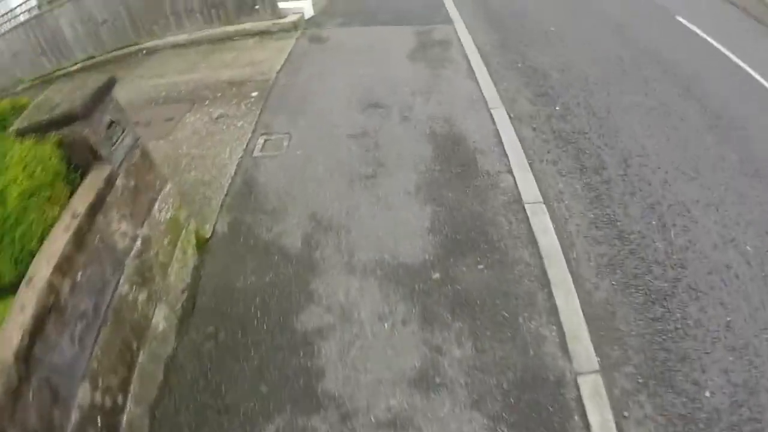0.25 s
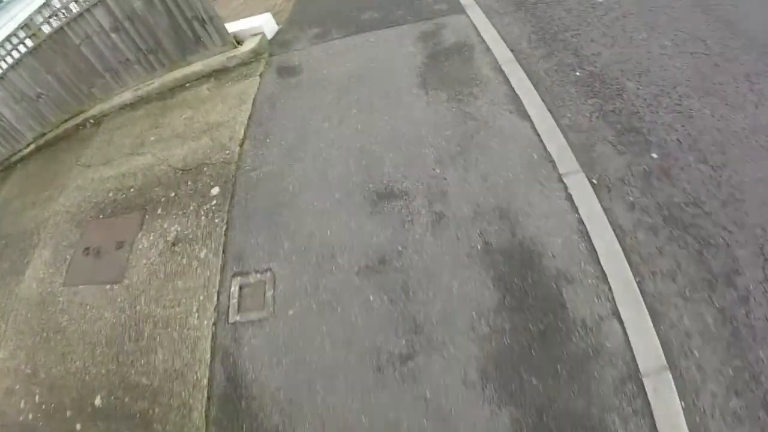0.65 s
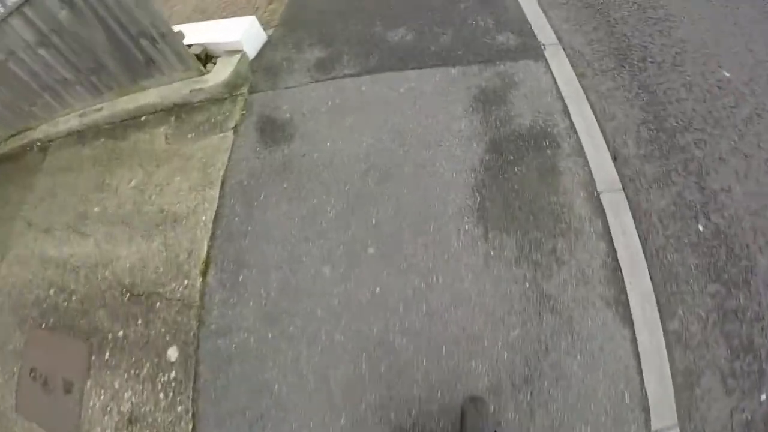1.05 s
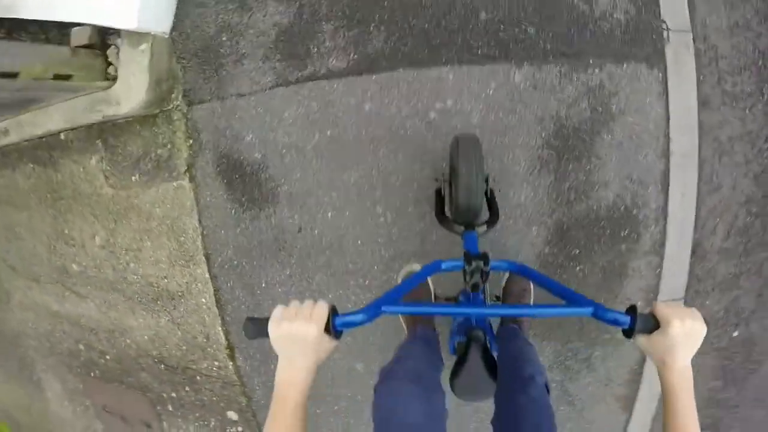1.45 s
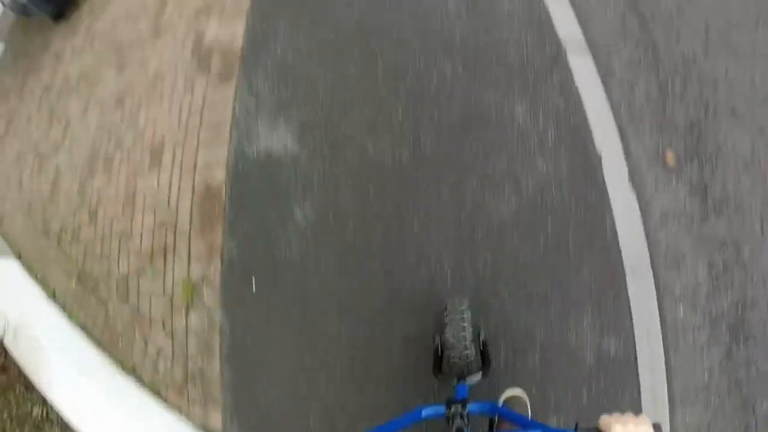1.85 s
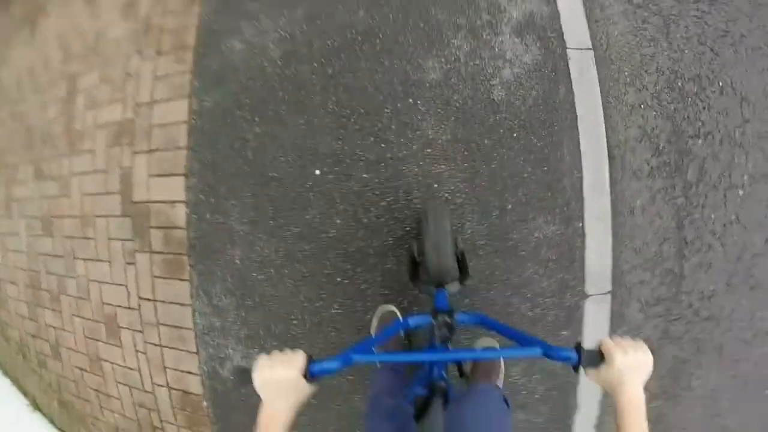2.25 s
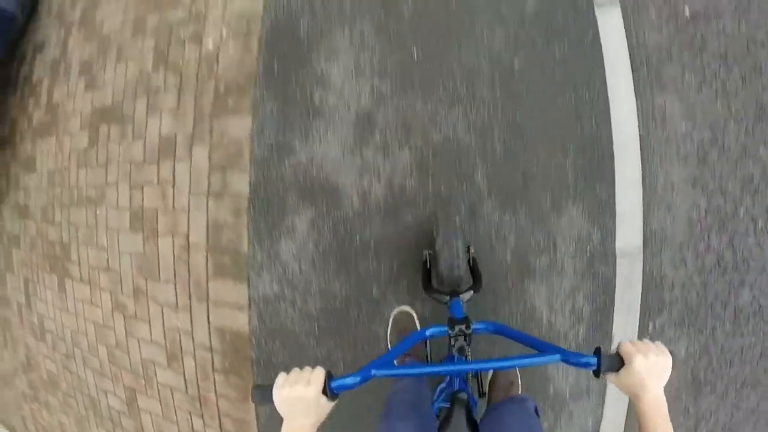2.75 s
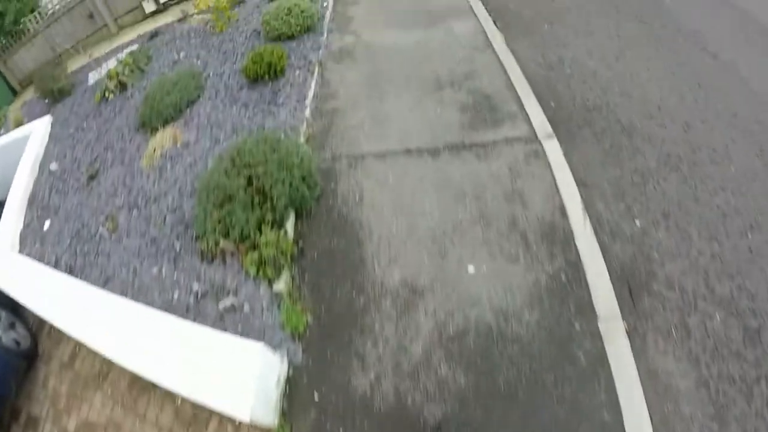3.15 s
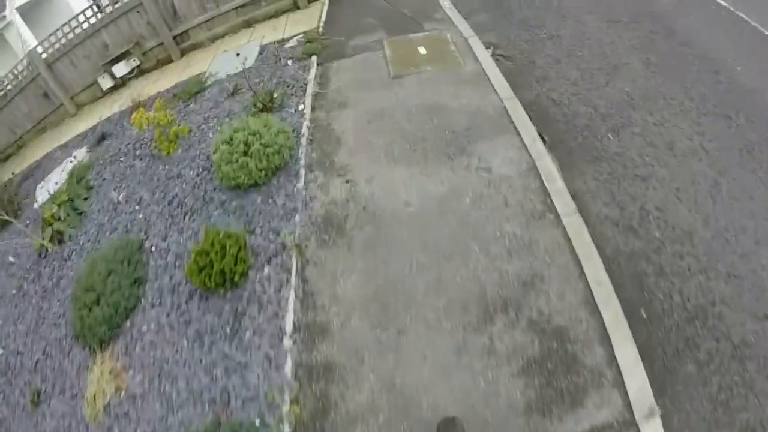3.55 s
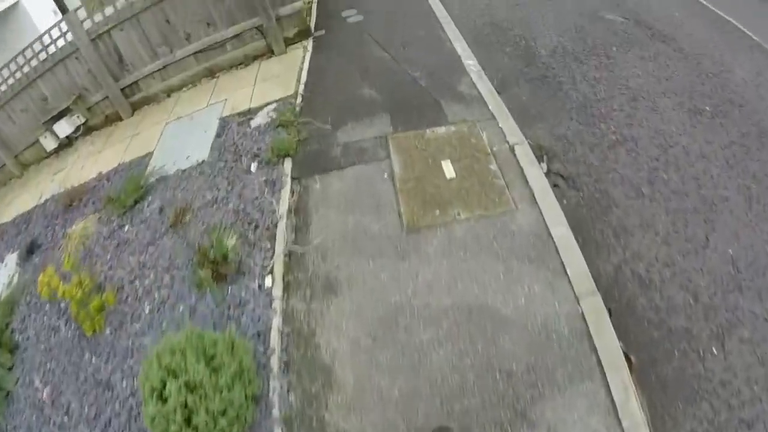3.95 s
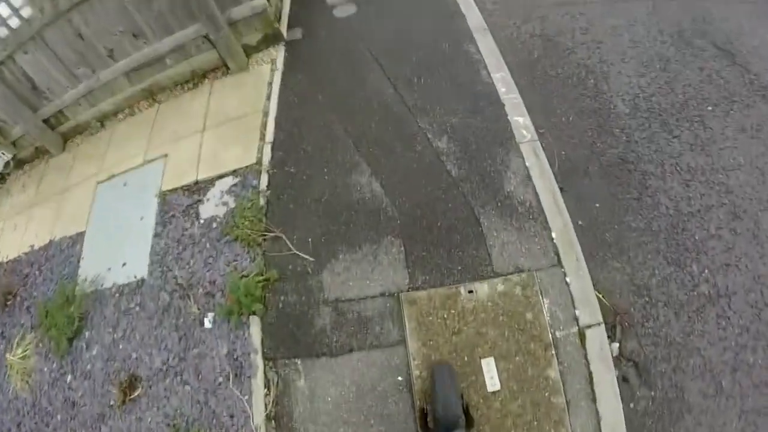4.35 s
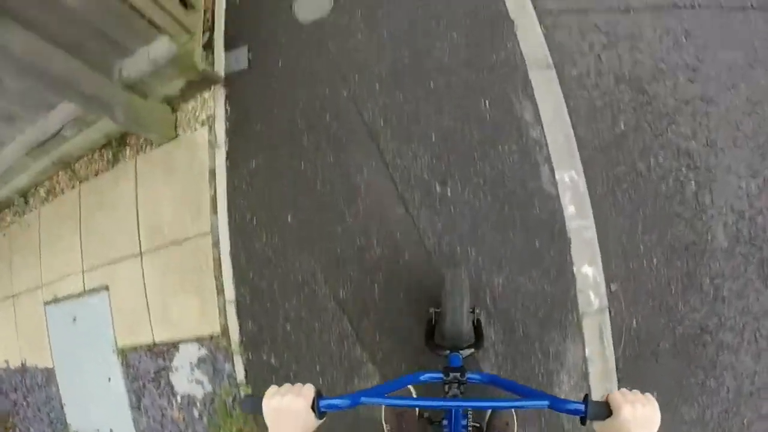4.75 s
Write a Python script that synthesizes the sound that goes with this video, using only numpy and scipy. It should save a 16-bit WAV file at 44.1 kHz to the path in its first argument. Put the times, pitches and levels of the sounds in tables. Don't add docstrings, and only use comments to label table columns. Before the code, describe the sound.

Close perspective from a head-worn camera outdoors on a small bike. A soft steady tyre and street wash lies under lumpy low wind bumps. Short dull strap scuffs and tiny ticks come scattered, stronger around the middle. Fabric drag builds, then just after four seconds a loud, uneven run of hard plastic knocks rattles for under a second, with faint springy pings, before quiet rolling returns.

```python
import sys
import numpy as np
from scipy import signal
from scipy.io import wavfile
from scipy.ndimage import uniform_filter1d, minimum_filter1d

SR = 44100
rng = np.random.default_rng(int(sys.argv[2]) if len(sys.argv) > 2 else 0)


def convert_level_to_amplitude(level_db):
    exponent = np.asarray(level_db, float) / 20
    return 10 ** exponent


def inscribe(sig):
    pcm = np.round(np.clip(np.atleast_2d(sig).T, -1, 1) * 32767)
    wavfile.write(sys.argv[1], SR, pcm.astype(np.int16))


N = 220588

CLIP = [(2200, -0.5, .022), (2401, -0.5, 0.0081), (2582, 1.5, 0.011), (2880, -3, 0.011)]


def evened(x):
    return x / np.sqrt(np.mean(x ** 2) + 1e-20)


def steadied(x, size):
    return x / np.sqrt(uniform_filter1d(x ** 2, size=size) + 0.037)


def add(mix, s, sound):
    part = mix[round(s * SR):][:len(sound)]
    part += sound[:len(part)]


def swells(rows, rest_db, t=None, edge=2):
    t = np.arange(N) / SR if t is None else t
    gain = convert_level_to_amplitude(rest_db)
    for s, db, width in rows:
        gain = gain + convert_level_to_amplitude(db) * np.exp(-.5 * abs((t - s) / width) ** edge)
    return gain


def noise(points, patchy_db, size):
    hz = np.fft.rfftfreq(size, 1 / SR)
    a, b, patches = rng.standard_normal((N * 4 // size + 5, len(hz), 3)).T
    patches = uniform_filter1d(patches, size=16, axis=0)
    patches = evened(uniform_filter1d(patches, size=8, axis=1))
    f, db = np.transpose(points)
    colour_db = np.interp(np.log(hz + 1), np.log(f + 1), db)[:, None]
    z = (a + 1j * b) * convert_level_to_amplitude(colour_db + patchy_db * patches)
    sound = signal.istft(z, nperseg=size, noverlap=size * 3 // 4)[1]
    return evened(sound[:N])


def resonate(x, hz, width):
    turn = np.exp(2j * np.pi * np.cumsum(hz * np.ones(len(x))) / SR)
    r = np.exp(-np.pi * width / SR)
    return 2 * (turn * signal.lfilter([1 - r], [1, -r], x / turn)).real


def resonate_twice(x, hz, width):
    return resonate(resonate(x, hz, width), hz, width)


def road():
    # (f/Hz, level/dB)
    wash_colour = [(41, -46), (70, -7), (107, -13.5), (168, -13.5), (565, -19.5), (1080, -23), (1700, -22),
                   (2380, -26), (2720, -24), (3480, -31), (4460, -31.5), (12200, -47), (15000, -57)]
    # (t/s, level/dB, half-width/s)
    loose = [
        (1.25, -71, 0.11),
        (1.75, -64, 0.16),
        (2.03, -69.5, .1),
        (2.85, -66.5, 0.32),
        (3.65, -69.5, 0.1),
        (4.9, -78, 0.22),
    ]
    # (t/s, level/dB, half-width/s)
    ribbed = [
        (.25, -64, 0.064),
        (3.7, -61, 0.076),
        (4.4, -53, 0.29),
    ]
    # (t/s, level/dB, half-width/s)
    taut = [
        (1.04, -79, .2),
        (1.6, -78, 0.064),
        (2.1, -75, 0.074),
        (3.0, -84, 0.24),
        (3.85, -84, 0.23),
    ]
    hum_colour = [(60, -43), (100, -7.5), (160, -2.5), (240, -10.0), (400, -19.0), (700, -86), (2000, -110)]
    wash = convert_level_to_amplitude(-55.5) * noise(wash_colour, patchy_db=0.5, size=1024)
    hum = noise(hum_colour, patchy_db=0.0, size=2048)
    struck = rng.random(N) < 4000 / SR
    grain_gain = convert_level_to_amplitude(3.4 * np.minimum(rng.exponential(1, N), 5))
    grains = struck * grain_gain * rng.standard_normal(N)
    tread = resonate_twice(grains, 2650, 400)
    grit = resonate(resonate(grains, 3700, 1700), 4280, 1500) + 1.3 * tread
    chain = resonate_twice(grains[::-1], 5870, 400)
    rolling = swells(ribbed, -66) * hum + swells(loose, -81.5) * evened(grit)
    return wash + rolling + swells(taut, -87.5) * evened(chain)


def wind():
    # (f/Hz, level/dB)
    wind_colour = [(3, -15), (8, 14), (20, 7), (35, -5.5), (50, -16.5), (80, -54.5)]
    # (f/Hz, level/dB)
    sway_colour = [(25, -28.5), (40, 4), (55, 2), (70, -17.5), (95, -15.5), (140, -52)]
    # (t/s, level/dB, half-width/s)
    gust_times = [(0.0, -39, 0.077), (.13, -39, .045), (.53, -39, 0.11), (.76, -34, 0.034),
                  (1.03, -30.5, 0.076), (1.19, -39, 0.017), (1.35, -28.5, 0.082), (1.63, -18.5, 0.039),
                  (1.8, -26, 0.043), (2.05, -46, 0.037), (2.23, -33.5, 0.27), (2.6, -22.5, 0.055),
                  (2.85, -38.5, 0.21), (3.06, -31.5, 0.073), (3.22, -40, 0.071), (3.37, -28.5, 0.02),
                  (3.56, -34, 0.096), (3.78, -44.5, 0.16), (3.95, -30.5, 0.018), (4.07, -31, 0.083),
                  (4.22, -38, 0.035), (4.4, -41.5, 0.058), (4.56, -38.5, 0.082), (4.73, -31, 0.047),
                  (4.93, -30, 0.087)]
    # (t/s, level/dB)
    jolts = [(.14, -52), (0.311, -52), (.43, -49.5), (.57, -40), (.85, -63), (1.63, -44), (1.72, -44),
             (1.81, -44), (2.06, -43.5), (2.27, -42), (2.55, -32.5), (2.73, -45), (3.05, -51),
             (3.22, -46.5), (3.48, -53), (3.6, -49), (4.06, -36), (4.15, -34.5), (4.259, -31), (4.38, -47),
             (4.479, -35.5), (4.61, -29.5), (4.77, -50)]
    gusts = steadied(noise(wind_colour, patchy_db=5.5, size=8192), size=5000)
    sway = steadied(noise(sway_colour, patchy_db=0.3, size=8192), size=2500)
    jolt_swells = [(s, db, 0.033) for s, db in jolts]
    low = swells(gust_times, -55) * gusts + swells(jolt_swells, -51.5) * sway
    return signal.sosfilt(signal.butter(4, 180, fs=SR, output="sos"), low)


def stroke(s, db, width):
    t = s + np.arange(-.2, .2, 1 / SR)
    return t[0], swells([(s, db - 1, width)], -120, t, edge=3)


def scuff(start, pressure, centre):
    size = len(pressure)
    unevenness = evened(uniform_filter1d(rng.standard_normal(size), size=90))
    slips = rng.standard_normal(size) * convert_level_to_amplitude(1.94 * unevenness)
    broad = resonate_twice(slips, centre, 1100)
    body = sum(resonate(broad, f, 350) for f in (1500, 1760, 2200, 2710))
    return start, pressure * evened(body + 0.57 * broad)


def brush(start, pressure):
    air = resonate_twice(rng.standard_normal(len(pressure)), 5200, 2800)
    return start, pressure * evened(air)


def strap():
    # (t/s, level/dB, half-width/s, f/Hz)
    scuffs = [(0.202, -54, 0.0092, 1700), (0.319, -60, .055, 1920), (.72, -58, 0.019, 1710),
              (0.824, -55, .025, 1850), (.995, -51, 0.0056, 1710), (1.322, -50.5, 0.011, 1770),
              (1.495, -56, 0.012, 1750), (1.571, -44, 0.019, 1770), (1.741, -69, 0.11, 2380),
              (2.116, -43.5, .02, 1650), (2.227, -47.5, 0.019, 1650), (2.316, -49.5, 0.022, 1620),
              (2.499, -55.5, 0.058, 1800), (2.592, -42.5, 0.019, 1720), (2.629, -45, 0.012, 1790),
              (2.74, -56, 0.04, 1670), (3.258, -52.5, 0.015, 1600), (3.446, -58, .012, 1980),
              (3.523, -56, 0.02, 1980), (3.74, -53.5, 0.068, 2250), (3.835, -50, 0.032, 1770)]
    # (t/s, level/dB, half-width/s)
    brushes = [
        (2.588, -58, 0.01),
        (2.719, -58, .007),
    ]
    # (t/s, level/dB, f/Hz)
    drag = [
        (3.3, -69, 1800),
        (3.44, -57, 1960),
        (3.66, -59, 2050),
        (3.78, -53, 2380),
        (3.96, -54.5, 1900),
        (4.07, -49.5, 2200),
        (4.7, -48.5, 2130),
        (4.821, -55.5, 1960),
        (5.0, -68, 2120),
    ]
    out = np.zeros(N)
    for s, db, width, hz in scuffs:
        add(out, *scuff(*stroke(s, db, width), hz))
    for row in brushes:
        add(out, *brush(*stroke(*row)))
    s, db, hz = np.transpose(drag)
    t = np.arange(N) / SR
    pressure = convert_level_to_amplitude(np.interp(t, s, db, left=-120))
    add(out, *scuff(0, pressure, np.interp(t, s, hz)))
    return out


def ring(s, modes, db, contact_ms, chatter_ms, spread_db=0.73):
    t = np.arange(3000)[:, None] / SR
    hz, height_db, t60 = np.transpose(modes)
    luck, detune, phase = rng.standard_normal((3, len(modes)))
    build_up = (1 - np.exp(-t * 3000 / max(contact_ms, .05))) ** 2
    swell = build_up * convert_level_to_amplitude(-60 * t / t60)
    swell = swell / swell.sum(0) * convert_level_to_amplitude(height_db + spread_db * luck)
    body = (swell * np.sin(2 * np.pi * hz * (1 + .007 * detune) * t + .9 * phase)).sum(1)
    chatter = rng.standard_normal(300) * np.exp(-t[:300, 0] * 1000 / chatter_ms)
    sound = signal.fftconvolve(chatter, body)
    power = uniform_filter1d(sound ** 2, size=100)
    return s - power.argmax() / SR, convert_level_to_amplitude(db) * sound / np.sqrt(power.max())


def thumps():
    # (t/s, level/dB)
    rocks = [(0.5373, -41), (4.071, -26.5), (4.1319, -34), (4.2212, -32), (4.252, -33.5), (4.3404, -28),
             (4.363, -34.5), (4.4407, -39), (4.5558, -31.5), (4.6346, -22), (4.6706, -30.5), (4.76, -25.5)]
    # (f/Hz, level/dB, t60/s)
    mount = [(99, -4.5, .07), (137, -4, 0.058), (160.3, 0, 0.051), (204.6, -7.5, 0.038)]
    out = np.zeros(N)
    for s, db in rocks:
        add(out, *ring(s, mount, db, contact_ms=3.5, chatter_ms=1.0))
    return out


def pings():
    # (t/s, level/dB, f/Hz, t60/s)
    spring = [
        (4.069, -37, 2200, 0.066),
        (4.219, -32.5, 2200, 0.029),
        (4.635, -38, 2200, 0.056),
        (4.635, -32, 2880, 0.027),
        (4.759, -37.5, 2210, 0.0875),
        (4.76, -47, 2870, 0.059),
    ]
    out = np.zeros(N)
    for s, db, hz, t60 in spring:
        add(out, *ring(s, [(hz, 0, t60)], db, contact_ms=2.5, chatter_ms=0.031))
    return out


def ticks():
    # (t/s, ring level/dB, clip level/dB)
    tick_times = [(0.256, -63, -52), (0.346, -58, -70), (0.5959, -58, -69), (0.9448, -62, -54),
                  (1.267, -63, -62), (1.5529, -60, -51), (1.7349, -54, -52), (1.781, -51, -46.5),
                  (2.0297, -50.5, -51.5), (2.0924, -58, -56), (2.6448, -56, -56), (2.8245, -68, -55),
                  (4.0097, -38, -35.5), (4.033, -48, -51), (4.199, -55.5, -49), (4.966, -50.5, -44),
                  (4.9747, -54, -42.5)]
    # (f/Hz, level/dB, t60/s)
    tick_modes = [(4240, -8, 0.0087), (4420, 4.5, 0.01), (5060, 2.5, 0.01), (5970, -1, 0.011),
                  (6250, -22, .007)]
    out = np.zeros(N)
    for s, ring_db, clip_db in tick_times:
        add(out, *ring(s, tick_modes, ring_db + 2, contact_ms=.5, chatter_ms=.1))
        add(out, *ring(s, CLIP[1:], clip_db + 1, contact_ms=.6, chatter_ms=.1))
    return out


def knocks():
    # (t/s, door level/dB, shell share/dB, clip share/dB, hardness/dB)
    blows = [(0.53, -29, -11, -6, -19), (4.045, -27.5, -11, -3, -9), (4.0631, -12, -23, -3.5, -8.5),
             (4.0640, -10, -26, -30, -7), (4.1218, -20, -21, -18.5, -9), (4.1286, -20, -4.5, -8.5, -9.5),
             (4.2140, -10, -22.5, -1, -13), (4.2172, -15.5, -19, -11.5, -9), (4.2425, -18, -4, -5.5, -7),
             (4.3255, -28.5, -2, -13, -14), (4.3373, -21.5, -4, -8, -12), (4.3528, -23.5, -12, -1, 0.4),
             (4.357, -17.5, -22, 0, -19), (4.4304, -23, -14, -13, -19), (4.5135, -23.5, -21, -8, -22),
             (4.5544, -21, -3, -5, -12.5), (4.5562, -40, 3, -1, -19.5), (4.6254, -23, -8, -18, 3),
             (4.6293, -27, -30, 21.5, -14), (4.6305, -9.5, -16.5, -19, 3.3), (4.6516, -19, -20, -14, -11),
             (4.7484, -23.5, -11, -7.5, -15), (4.7535, -18.5, -16, 6.5, -18.5),
             (4.7555, -25.5, -10, -0.2, 5)]
    # (t/s, door level/dB, shell share/dB)
    bounces = [(4.0691, -37.5, 3.5), (4.139, -34, -2.5), (4.2346, -30, -0.5), (4.251, -33.5, -1.5),
               (4.3419, -37, 5), (4.365, -45, -1), (4.4399, -31, 2.9), (4.4441, -41, -7),
               (4.5416, -33.5, -0.5), (4.5444, -31.5, -14), (4.5619, -32.5, -4), (4.636, -36, -19),
               (4.6485, -26, -6.5), (4.6632, -26, -1.5), (4.8724, -44, 0.5)]
    # (f/Hz, level/dB, t60/s)
    shell = [(438.2, -5.5, 0.07), (531, 10.5, .026), (686, 5, .026)]
    door = [(1337, -5, 0.0089), (1494, 0.5, 0.0092), (1672, -2, 0.011), (1900, -6, 0.018)]
    lid = [(980, 0, .022)]
    lens_ring = [(3490, 0, .012), (4640, -3, .009), (5100, -8, .01), (5650, -14, .011)]
    glass = [(6330, -0.5, 0.012), (6834, 4.5, 0.0059), (7820, -12, 0.012), (8400, -30, 0.0089),
             (9520, -12, 0.006), (9700, -26, 0.016), (11400, -27, 0.0056), (13370, -34, .007)]
    out = np.zeros(N)
    soft = [(*row, -9, -13) for row in bounces]
    for s, door_db, shell_share_db, clip_share_db, hard_db in blows + soft:
        shell_db = door_db + shell_share_db
        clip_db = door_db + clip_share_db
        ring_db = clip_db + hard_db
        lid_db = door_db - 16.5 + .5 * (door_db + 10.5)
        glass_db = ring_db - 13 + 0.92 * (ring_db + 22.5)
        contact_ms = 2.1 / convert_level_to_amplitude(0.4 * (hard_db + 12.5))
        add(out, *ring(s, door, door_db, contact_ms, chatter_ms=0.083))
        add(out, *ring(s + 0.00263, shell, shell_db, 1.5 * contact_ms, chatter_ms=0.19))
        add(out, *ring(s + 0.0011, lid, lid_db, 1.4 * contact_ms, chatter_ms=0.079))
        add(out, *ring(s, CLIP, clip_db, contact_ms, chatter_ms=0.18))
        add(out, *ring(s, lens_ring, ring_db, 0.44 * contact_ms, chatter_ms=0.085))
        add(out, *ring(s, glass, glass_db, 0.49 * contact_ms, chatter_ms=0.12))
    return out


def rattle():
    return thumps() + pings() + ticks() + knocks()


def scene():
    return (road() + wind() + strap() + rattle())[None]


def band_limit(x):
    return signal.sosfilt(signal.butter(12, 15140, fs=SR, output="sos"), x)


def record(dry):
    peaks = -minimum_filter1d(-abs(dry), size=201)
    over = np.maximum(peaks / .92, 1)
    limited = dry / uniform_filter1d(over, size=101)
    return band_limit(limited)


dry = scene()
out = record(dry)
inscribe(out)
```